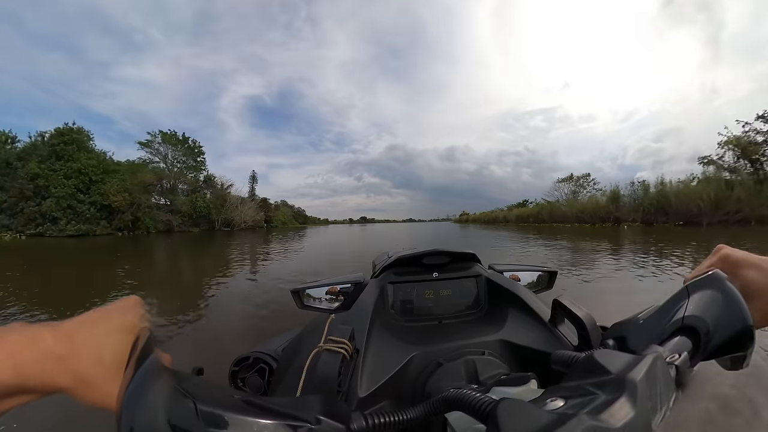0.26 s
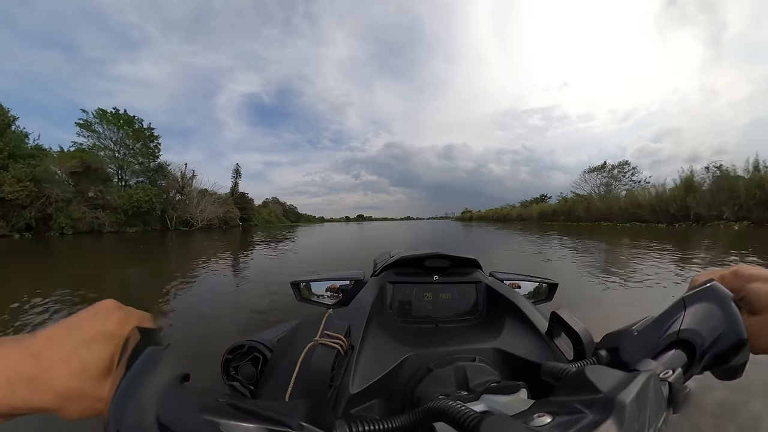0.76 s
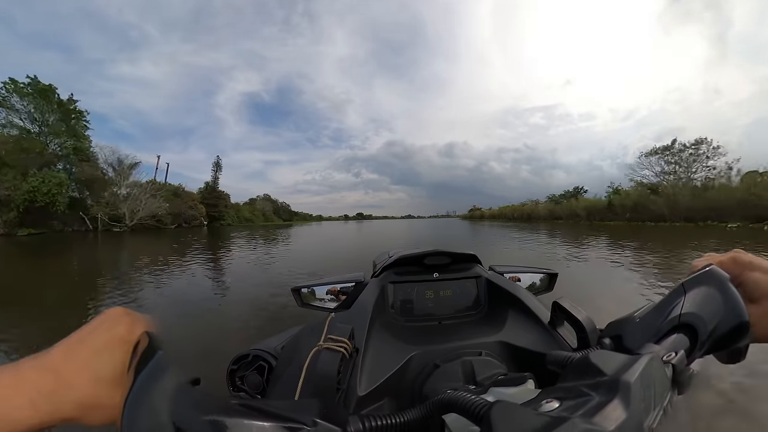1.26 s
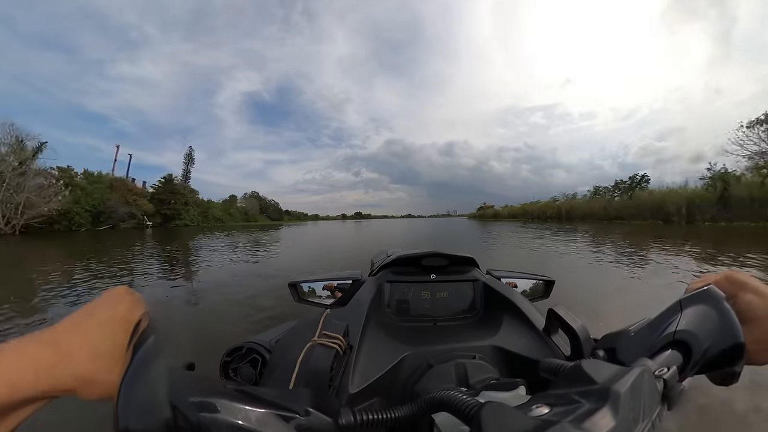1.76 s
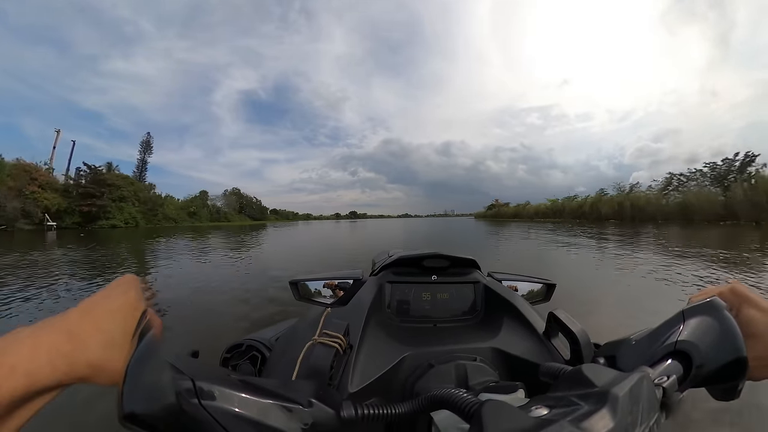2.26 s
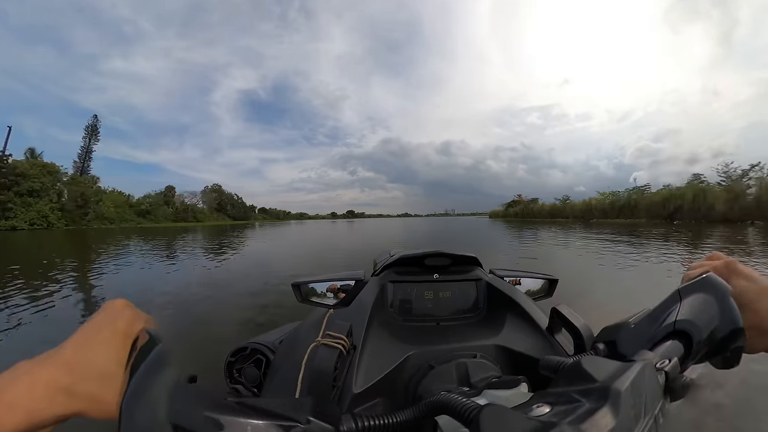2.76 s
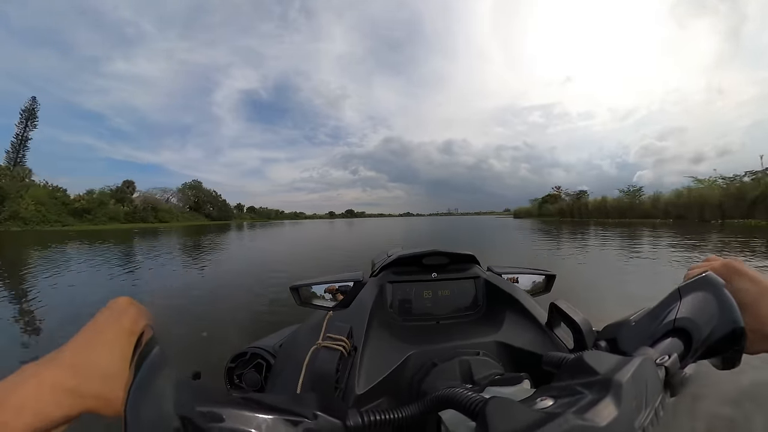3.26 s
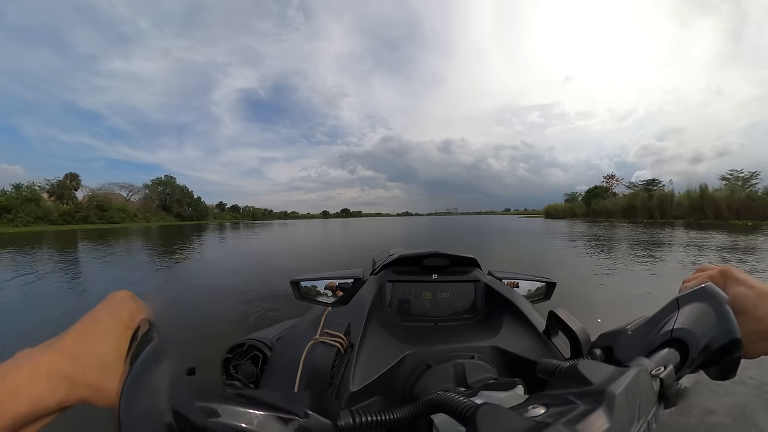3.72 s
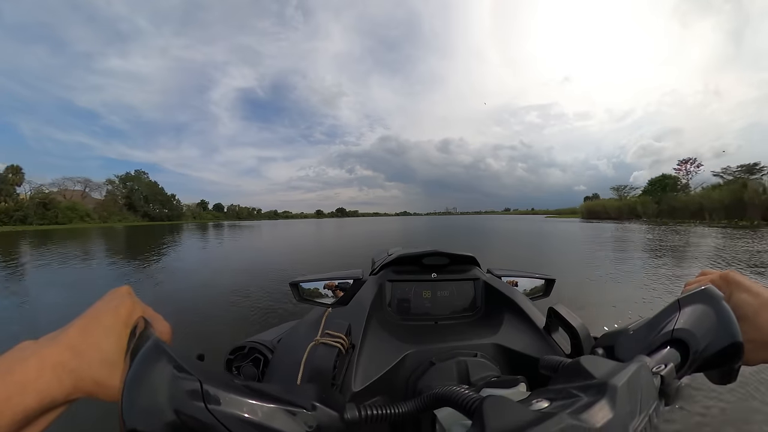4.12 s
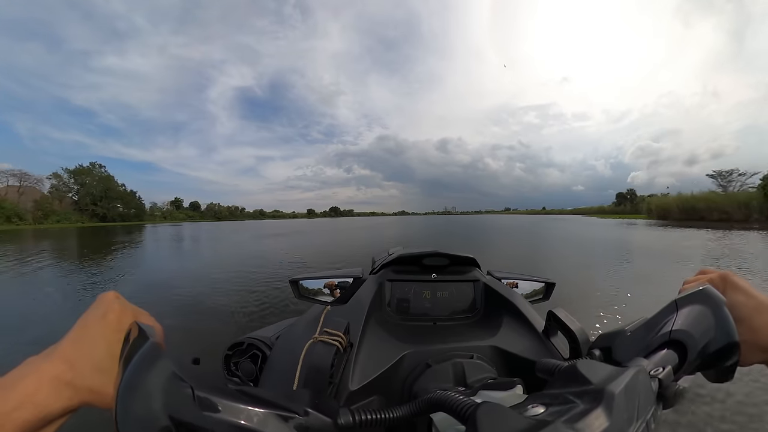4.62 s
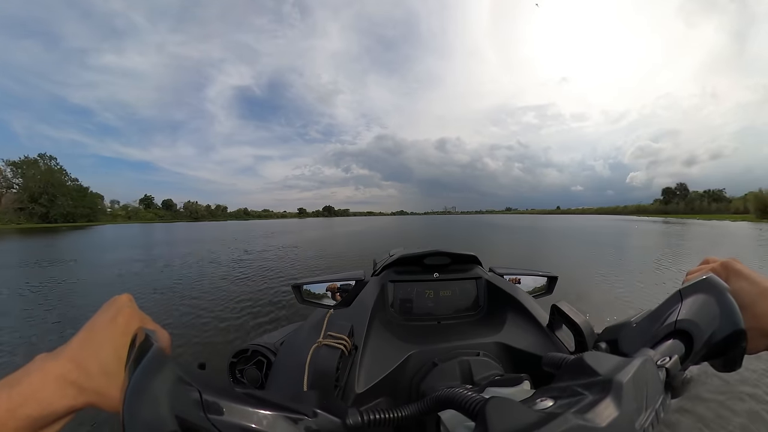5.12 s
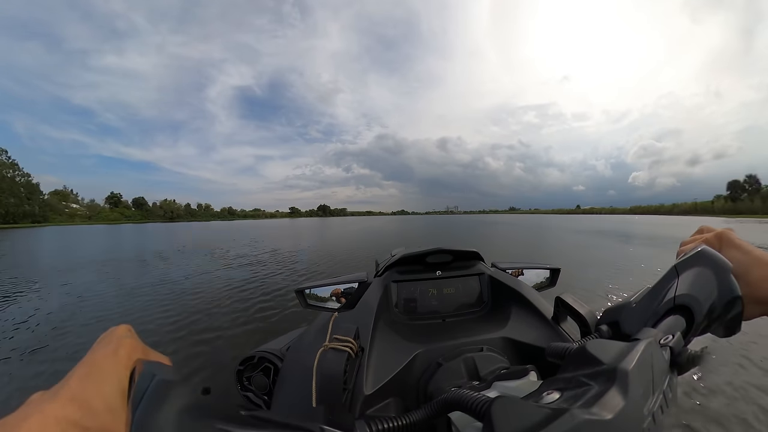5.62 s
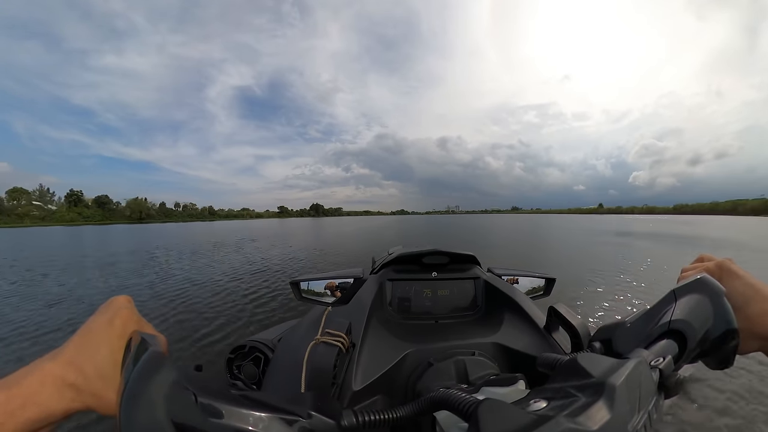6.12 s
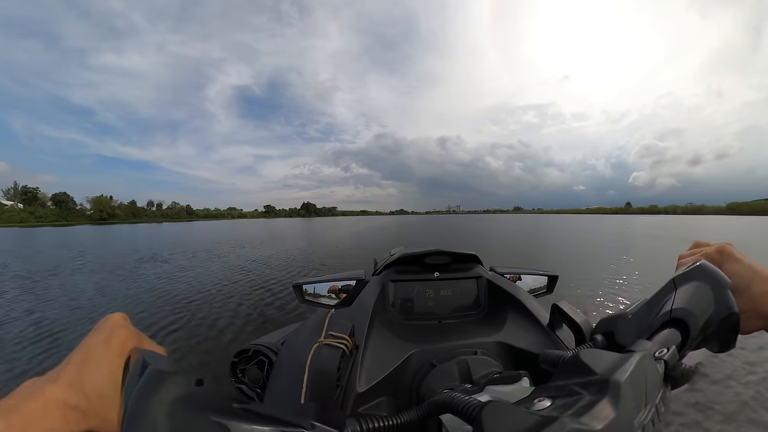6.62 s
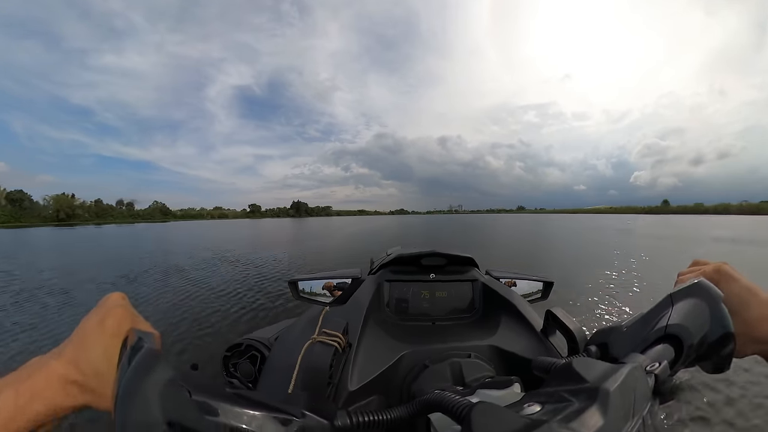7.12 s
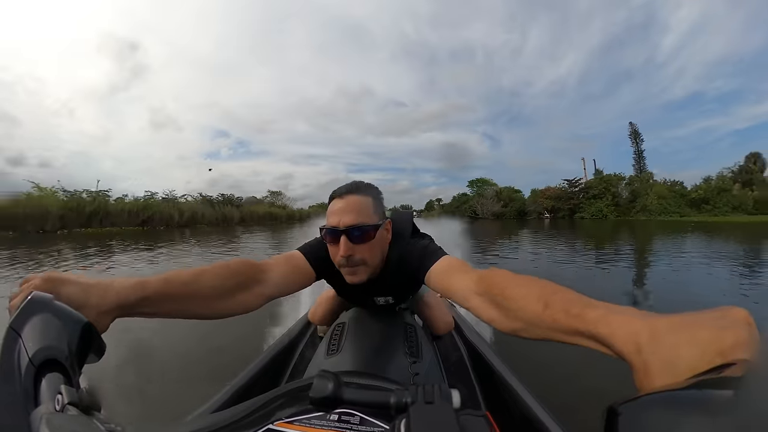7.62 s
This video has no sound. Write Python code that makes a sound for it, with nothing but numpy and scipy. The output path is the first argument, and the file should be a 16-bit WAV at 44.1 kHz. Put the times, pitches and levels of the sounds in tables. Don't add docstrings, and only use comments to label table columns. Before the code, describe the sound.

A loud, dense onboard sound outdoors on open water, heard by a microphone close to the handlebars. From 0 to 0.5 seconds a three-cylinder watercraft engine surges from a low growl to a higher, hard drone of about 200 hertz, then holds nearly steady. A thin, blurred supercharger whine around six kilohertz is strongest at launch and soon sinks into the noise. Around 1 second the drone stutters briefly as water covers the exhaust; smaller dips follow near 3.2, 4.7 and after 6. Low wind rumbles and buffets throughout, while rushing water and spray hiss grow as the craft planes. Hollow knocks of chop strike the hull, clustered from 2.3 to 3.9 seconds, then scattered. At about 7.2 seconds the sound switches abruptly, with a slight tick, to an earlier stretch of the same roar and continues until the end.

```python
import sys
import numpy as np
from scipy import signal
from scipy.fft import rfft, irfft, next_fast_len
from scipy.io import wavfile
from scipy.ndimage import uniform_filter1d, map_coordinates

SR = 44100
rng = np.random.default_rng(int(sys.argv[2]) if len(sys.argv) > 2 else 0)


def gain_from_db(level_db):
    decades = np.asarray(level_db, float) / 20
    return 10 ** decades


def bounce(signal):
    frames = np.transpose(np.atleast_2d(signal))
    limited = np.clip(frames, -1, 1)
    pcm = np.round(limited * 32767).astype(np.int16)
    wavfile.write(sys.argv[1], SR, pcm)


N = 347508
T = np.arange(N) / SR


def unit(x):
    return x / np.sqrt(np.mean(x ** 2) + 1e-20)


def curve(rows):
    s, value = np.transpose(rows)
    return np.interp(T, s, value)


def wobble(rate):
    coarse = np.arange(0, N + 32, 32)
    knots = rng.standard_normal(int(N * rate / SR) + 4)
    smooth = map_coordinates(knots, [coarse * rate / SR])
    return np.interp(np.arange(N), coarse, smooth)


def bumps(rows, half_s):
    t = np.arange(0, N + 64, 64) / SR
    total = sum(db * np.exp(-((t - s) / half_s) ** 2) for s, db in rows)
    return np.interp(T, t, total)


def rush(spectrum, patchy_db):
    z = signal.stft(rng.standard_normal(N + SR // 4), nperseg=512)[2]
    field = uniform_filter1d(rng.standard_normal(z.shape), 8, 0)
    field = uniform_filter1d(field, 8, 1)
    noise = signal.istft(z * gain_from_db(patchy_db * unit(field)), nperseg=512)[1]
    m = next_fast_len(len(noise))
    hz, db = np.transpose(spectrum)
    log_hz = np.log(np.fft.rfftfreq(m, 1 / SR) + 1)
    colour = gain_from_db(np.interp(log_hz, np.log(hz), db))
    return unit(irfft(rfft(noise, m) * colour, m)[:N])


def tone(turns, db, flutter_db, drift, rate):
    level_db = db + flutter_db * wobble(rate) - flutter_db ** 2 / 10
    size = np.exp(level_db * np.log(10) / 20)
    return np.sqrt(2) * size * np.sin(2 * np.pi * turns + drift * wobble(rate) + 7 * rng.random())


STAGES = [0.13, 1, 4.7]


def by_stage(db):
    return np.interp(T, STAGES, db)


# time_s, cycle_hz
SPEED = [(0.0, 50.3), (0.06, 50.95), (0.1, 53.76), (0.15, 57.33), (0.2, 60.64), (0.27, 63.16),
         (0.35, 65.06), (0.45, 66.4), (0.57, 67.15), (0.8, 67.52), (1.3, 67.7), (1.8, 67.83), (2.3, 67.73),
         (4.0, 67.75), (5.4, 67.3), (5.9, 67.27), (6.4, 67.37), (7.18, 67.2)]


def crank():
    return np.cumsum(curve(SPEED)) / SR


# centre_s, depth_db
DUCKS = [(0.94, 6), (.98, 15), (1.02, 19), (1.3, 6.5), (1.4, 8), (1.74, 2), (3.18, 9), (3.22, 10),
         (3.57, 3), (4.42, 3), (4.72, 12), (4.9, 1.5), (5.8, 0), (6.09, 7.5), (6.52, 8), (6.7, 10),
         (6.9, 5)]


def ducking():
    return bumps(DUCKS, half_s=.029)


# time_s, level_db
LOAD = [(0, -19.5), (.06, -16), (.12, -11.5), (.35, -9), (.6, -19.5), (.84, -14.5), (1.15, -15.5),
        (2.3, -13.5), (2.95, -18), (3.45, -13.5), (3.6, -16), (5.95, -17), (6.05, -12.5), (6.45, -16.5),
        (7.18, -16.5)]


def firing(cycle):
    db = curve(LOAD) - ducking() + 0.78 * wobble(7)
    return tone(3 * cycle, db, flutter_db=2.0, drift=0.48, rate=25)


HULL_ORDERS = [6, 8, 9, 15, 18]
HULL_DB = [-40.5, -39, -47.5, -50.5, -50.5]
# order_index, centre_s, half_length_s, peak_db
SWELLS = [(0, 0.32, 0.5, -24), (0, 1.09, 0.59, -28), (0, 1.5, 0.46, -32), (0, 2.3, .45, -35),
          (0, 5.1, .15, -32), (0, 6.0, .12, -30.5), (1, 0.16, 0.18, -32), (1, 1.1, .15, -36),
          (1, 1.85, 0.53, -28.5), (1, 2.45, .4, -29), (1, 4.45, 0.26, -34), (1, 5.4, 0.12, -30),
          (2, 0.93, .2, -38.5), (2, 1.154, .22, -27), (2, 2.2, .2, -38), (2, 5.4, .12, -39),
          (2, 6.0, .15, -34.5), (2, 7.0, .2, -36), (3, 0.6, .15, -42), (3, 1.05, 0.18, -39),
          (3, 2.2, .6, -42), (3, 5.5, 1.3, -44.5), (4, .4, .1, -43), (4, 1.0, .3, -43), (4, 1.7, .3, -45.5),
          (4, 2.8, .3, -43), (4, 5.05, 0.13, -43)]


def hull_orders(cycle):
    sound = np.zeros(N)
    for i, (order, steady_db) in enumerate(zip(HULL_ORDERS, HULL_DB)):
        lifts = [bumps([(s, peak_db - steady_db)], half_s)
                 for j, s, half_s, peak_db in SWELLS if round(j) == i]
        db = steady_db + np.max(lifts, axis=0) + 0.94 * wobble(3)
        sound += tone(order * cycle, db, flutter_db=1.56, drift=.45, rate=18)
    return sound


MINOR_ORDERS = [1, 2, 4, 5, 7, 10, 11, 12, 14, 17, 19]
# launch_db, climbing_db, at_speed_db
MINOR = [(-43.5, -32, -35.5), (-29.5, -24.5, -38), (-28.5, -38.5, -45.5), (-47, -48, -46),
         (-41, -42.5, -39.5), (-54, -39.5, -55), (-48.5, -40.5, -53.5), (-46, -49.5, -55.5),
         (-59, -50, -53.5), (-54, -58.5, -53.5), (-59.5, -62.5, -58.5)]


def minor_orders(cycle):
    return sum(tone(order * cycle, by_stage(db), flutter_db=4, drift=0.55, rate=8)
               for order, db in zip(MINOR_ORDERS, MINOR))


# centre_s, depth_db
SHADES = [(.6, -7), (.75, -3), (.9, -2), (1.1, 3), (1.3, 7), (1.55, 4), (2.42, 5), (3.3, 4), (3.55, -4),
          (3.92, 5), (5.05, 1), (5.85, 10), (5.95, 10), (6.55, 6), (6.8, 7)]


def blower(cycle):
    order = 92.78
    whine_db = -55.5 + 9.5 * np.exp(-T / 0.43)
    whine_db -= 6 * np.exp(-(T / 0.12) ** 2)
    whine_db += .9 * wobble(7) - bumps(SHADES, half_s=.06)
    drift = np.interp(T, [.12, .45], [1.7, 1.05])
    sound = tone(order * cycle, whine_db, flutter_db=3.5, drift=drift, rate=90)
    octave_db = np.interp(T, [0, .27, .4], [-77, -74, -110])
    sound += tone(2 * order * cycle, octave_db, flutter_db=2, drift=3.5, rate=90)
    alias_db = octave_db - np.interp(T, [.05, .2], [28, 7])
    sound += tone(24000 * T - 2 * order * cycle, alias_db, flutter_db=3, drift=1.5, rate=55)
    return sound


SIDE_STAGES = [.35, .8, 2.2, 4.2]
# launch_db, climbing_db, planing_db, at_speed_db
SIDE_LINES = [(-76, -59, -66, -79.5), (-78, -62.5, -68, -78.5), (-71, -59.5, -63, -75)]


def blower_side_lines(cycle):
    return sum(tone(order * cycle, np.interp(T, SIDE_STAGES, db), flutter_db=3.0, drift=1.3, rate=60)
               for order, db in zip([89.8, 95.8, 100.9], SIDE_LINES))


# time_s, level_db
WIND = [(0, -20), (.06, -20), (.26, -26.5), (.36, -17.5), (.6, -18.5), (.8, -20), (1.0, -15.5), (1.5, -18),
        (2.2, -19), (2.7, -17), (3.05, -16), (4.3, -17), (5.5, -17.5), (7.18, -16)]
# centre_s, height_db
GUSTS = [(1.56, -3), (1.92, 2), (1.97, -5), (2.14, -5.5), (2.32, 3), (3.1, 7), (3.3, -1.5), (3.57, 5.5),
         (3.63, -3.5), (3.73, 2), (3.8, -2), (3.89, 2), (4.1, 3), (4.4, -5), (4.72, 3), (4.85, 4.5),
         (4.94, -2), (5.08, -4), (5.78, 6), (5.84, -3), (5.9, 2.5), (6.48, -2.5), (6.53, -2)]
# freq_hz, density_db
BUFFET = [(15, -28), (35, -13), (60, -1), (100, 0), (135, -3), (170, -6.5), (300, -45.5), (800, -100),
          (3000, -150)]
# freq_hz, density_db
THUD = [(4, -1.5), (12, -2), (25, -2), (40, -1.5), (60, -4), (100, -36), (1000, -150)]


def buffeting():
    db = curve(WIND) - .8 + bumps(GUSTS, half_s=.03) + 1.14 * wobble(10)
    db += by_stage([-2.5, -.8, 1.4])
    return gain_from_db(db) * rush(BUFFET, patchy_db=-0.2) + gain_from_db(-25.0) * rush(THUD, patchy_db=-1.3)


# freq_hz, density_db
DRUM = [(20, -79.5), (100, -24), (140, -5), (180, 2), (225, -3.5), (260, -15), (400, -48.5), (3000, -150)]


def drumming():
    return gain_from_db(by_stage([-27, -21, -21]) - 0.15 * ducking()) * rush(DRUM, patchy_db=1.4)


def wind_guard(wind):
    slow = np.abs(uniform_filter1d(wind ** 2, SR // 3)) + 1e-9
    fast = np.abs(uniform_filter1d(wind ** 2, SR // 14))
    return wind * (fast / slow + 1e-3) ** -.11


# freq_hz, density_db
WASH = [(20, -93), (150, -28), (230, 1), (300, -0.5), (380, -6), (500, -16.5), (900, -52), (5000, -150)]


def wash(gust, throb):
    db = np.interp(T, [0, .45, 1.25, 1.6, 2.1, 2.9], [-22, -31, -27.5, -31.5, -28.5, -23.5])
    db += 1.87 * wobble(7.3) + 0.27 * gust + 0.69 * throb
    return gain_from_db(db) * rush(WASH, patchy_db=0.05)


# time_s, level_db
WATER = [(0, -44), (.12, -35), (.3, -38), (.65, -37), (.85, -34), (1.25, -31.5), (1.55, -33.5), (2.3, -32),
         (2.8, -32), (3.25, -33.5), (3.9, -32), (4.4, -30.5), (5.2, -30), (5.9, -29), (6.3, -29),
         (6.6, -30.5), (6.85, -29), (7.2, -29.5)]
# freq_hz, density_db
RUSH = [(20, -88), (280, -27.5), (420, 2.5), (600, 1), (800, -4.5), (1000, -5.5), (1300, -8), (1700, -14),
        (2200, -20.5), (4000, -53), (12000, -150)]


def rushing_water(gust, throb):
    db = curve(WATER) + 0.37 * wobble(9) + 3.5 + 0.26 * gust + 0.31 * throb
    return gain_from_db(db) * rush(RUSH, patchy_db=-0.42)


# centre_s, height_db
SHEETS = [(.3, 2.5), (.42, -2), (.8, 2), (1.0, -1.5), (1.38, 1), (1.5, 4), (1.63, -4), (1.83, 1), (1.96, 1),
          (2.3, 3), (3.22, -3.5), (5.5, 1.5), (6.05, 0.5), (6.14, 2.5), (6.25, 1), (6.35, 1.5),
          (6.58, -0.5)]
# freq_hz, density_db
SPRAY = [(100, -91), (1000, -24), (1900, -2.5), (3000, -1), (4000, -8), (5200, -15), (7000, -33),
         (11000, -46.5), (16000, -64)]


def spray(gust, throb):
    force_db = curve(WATER)
    db = -42 + .8 * (force_db - force_db.mean()) + by_stage([-.8, .8, -.8])
    db += bumps(SHEETS, half_s=.04) + 0.34 * wobble(8) + 0.31 * gust + 0.28 * throb
    return gain_from_db(db) * rush(SPRAY, patchy_db=0.57)


# freq_hz, density_db
AIR = [(300, -91), (2500, -14), (4000, -1.5), (5500, -4), (6500, -6), (7500, -10.5), (9000, -18.5),
       (11000, -26.5), (11800, -31.5), (14000, -44), (16000, -56)]


def air_hiss(gust):
    return gain_from_db(-51 + 0.5 * gust) * rush(AIR, patchy_db=0.3)


def flow(cycle):
    gust = .5 * wobble(5.8) + .5 * wobble(35)
    throb = np.sin(2 * np.pi * cycle) + 0.4 * np.sin(4 * np.pi * cycle) + 0.64 * np.sin(6 * np.pi * cycle)
    wind = wind_guard(buffeting() + drumming())
    water = wash(gust, throb) + rushing_water(gust, throb)
    return wind + water + spray(gust, throb) + air_hiss(gust)


# start_s, peak_db, pitch_hz, thump_db
SLAPS = [(0.184, -27, 501, 7), (0.624, -23, 560, 13), (1.774, -19, 544.2, -6), (2.293, -11, 541, 2),
         (2.366, -9, 560, 0), (2.886, -17, 538, -3), (2.951, -8, 555, 3), (3.079, -12.5, 870, -8),
         (3.093, -6, 453, -1), (3.192, -8.5, 620, 5), (3.254, -19, 541, 11), (3.359, -9.5, 650, 6),
         (3.581, -13, 400, 7), (3.645, -18, 514, 3), (3.91, -5, 496.7, -10), (4.668, -17, 557, 14),
         (4.715, -18, 571, 0), (4.852, -10, 590, 8), (5.059, -16, 514, -8), (5.377, -32, 549, -5),
         (5.546, -10, 536, 9), (5.632, -19, 510, -3), (5.701, -14, 513, 6), (5.923, -17, 502, -1),
         (5.986, -24, 544, 3), (6.304, -25, 610, 3), (6.476, -22, 584, 7), (6.877, -11, 536, -1),
         (7.113, -6, 503.3, 4)]


def slaps():
    out, t = np.zeros(N + SR), np.arange(SR // 20) / SR
    attack = 1 - np.exp(-t / 0.0011)
    for s, db, hz, thump_db in SLAPS:
        puff = uniform_filter1d(rng.standard_normal(len(t)), 14)
        knock = gain_from_db(-60 * t / 0.018) * (np.sin(2 * np.pi * hz * t) + 0.77 * puff)
        thump = gain_from_db(thump_db - 5.5 - 60 * t / 0.041) * np.sin(2 * np.pi * 260 * t)
        out[round(s * SR):][:len(t)] += gain_from_db(db + 2.0) * attack * (knock + thump)
    return signal.sosfilt(signal.butter(4, 1600, fs=SR, output="sos"), out[:N])


def scene():
    cycle = crank()
    engine = firing(cycle) + hull_orders(cycle) + minor_orders(cycle)
    engine += blower(cycle) + blower_side_lines(cycle)
    return (engine + flow(cycle) + slaps())[None]


def roll_off(x):
    return signal.sosfilt(signal.butter(12, 15750, fs=SR, output="sos"), x)


def record(dry):
    power = np.abs(uniform_filter1d(dry ** 2, SR // 40, axis=1)) + 1e-9
    x = dry * (power / gain_from_db(-22.5)) ** -.2
    x = x / (1 + np.abs(x / 0.81) ** 4) ** (1 / 4)
    change_s, fade_s, back_samples = 7.1865, .012, 188159
    stairs = np.clip((np.arange(N) // 44 * 44 / SR - change_s) / fade_s, 0, 1)
    x = x * (1 - stairs) + np.roll(x, back_samples, axis=1) * stairs
    fade_in = np.clip(np.arange(N) / 40 + .1, 0, 1)
    fade_out = np.clip((N - np.arange(N)) / 90 + .3, 0, 1)
    return roll_off(x * fade_in * fade_out)


dry = scene()
out = record(dry)
bounce(out)
```